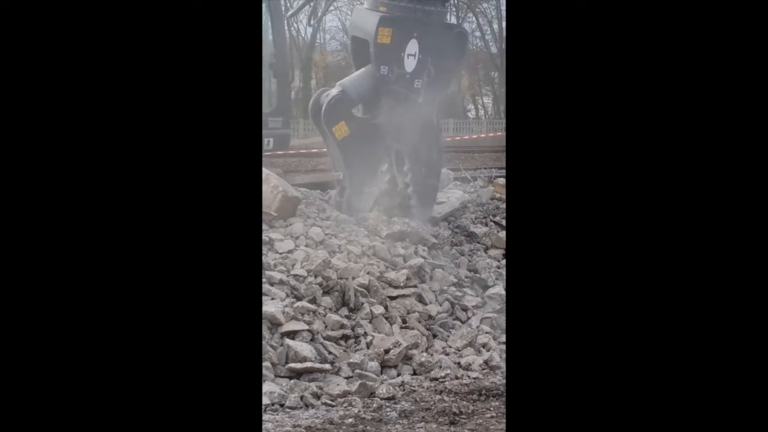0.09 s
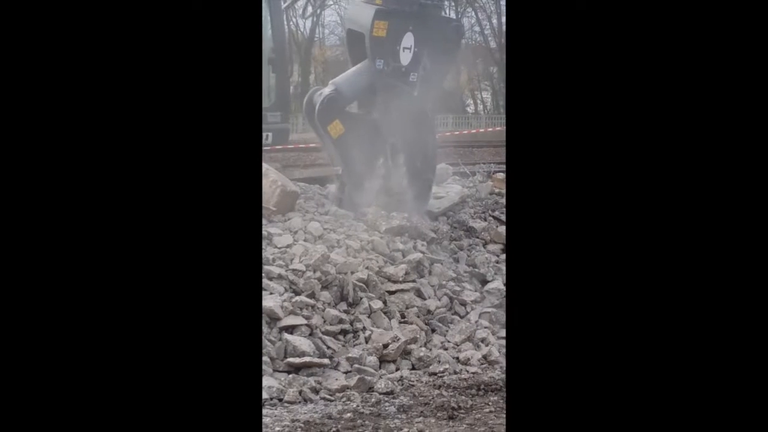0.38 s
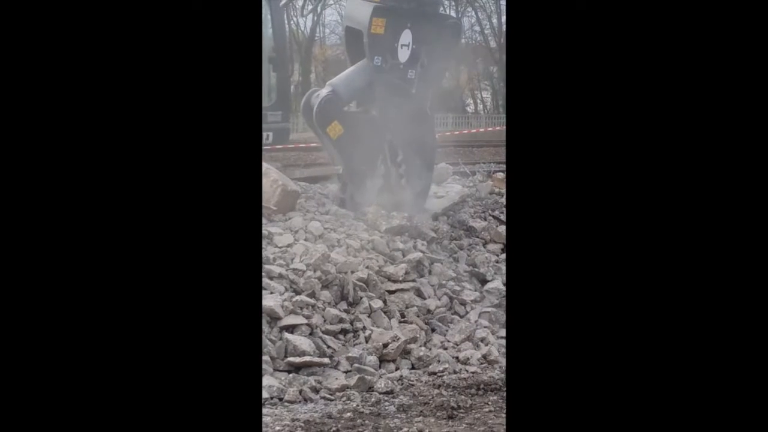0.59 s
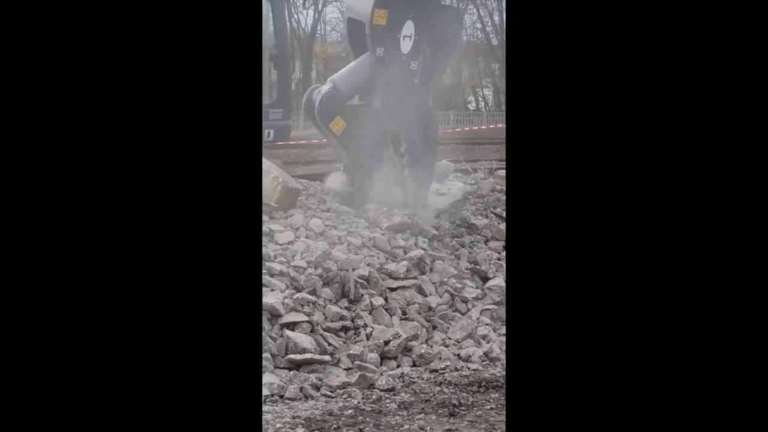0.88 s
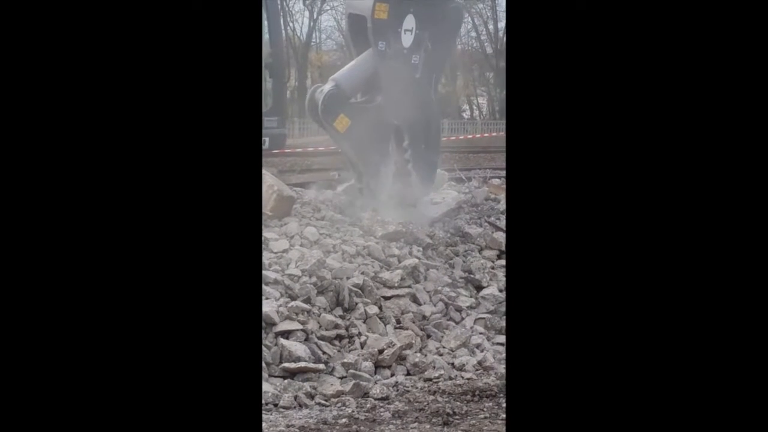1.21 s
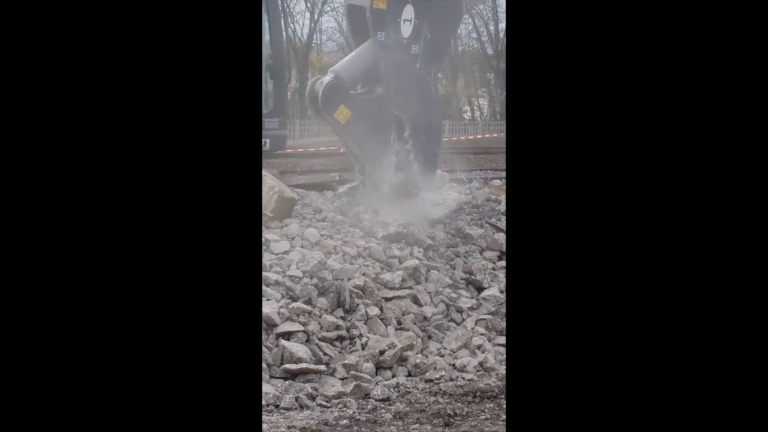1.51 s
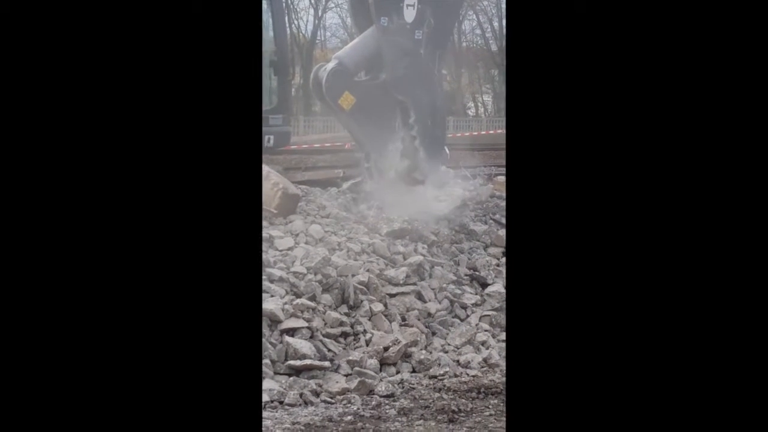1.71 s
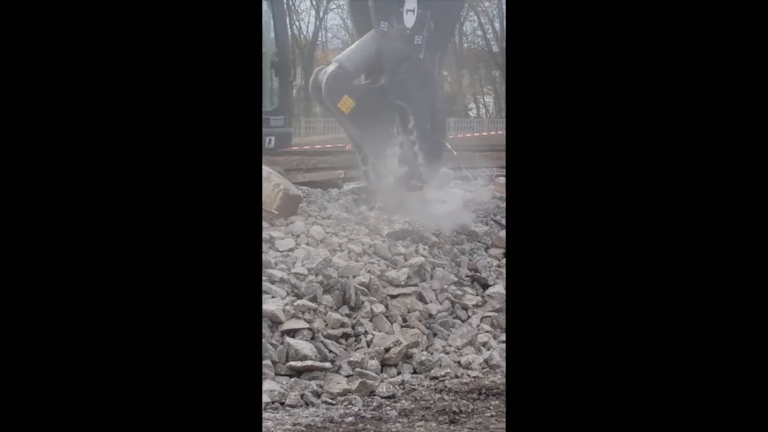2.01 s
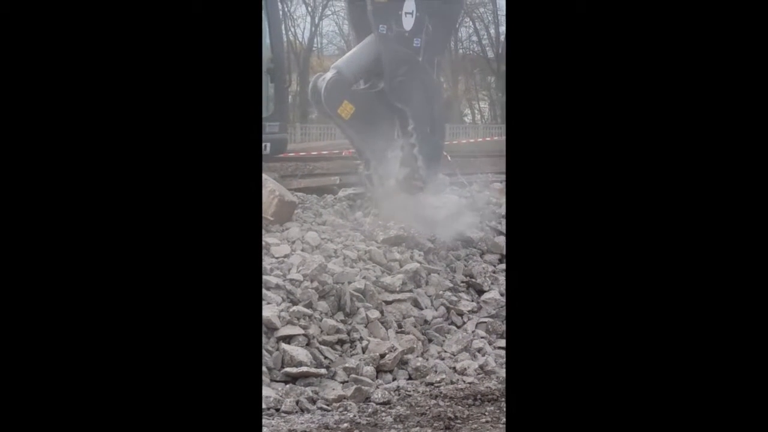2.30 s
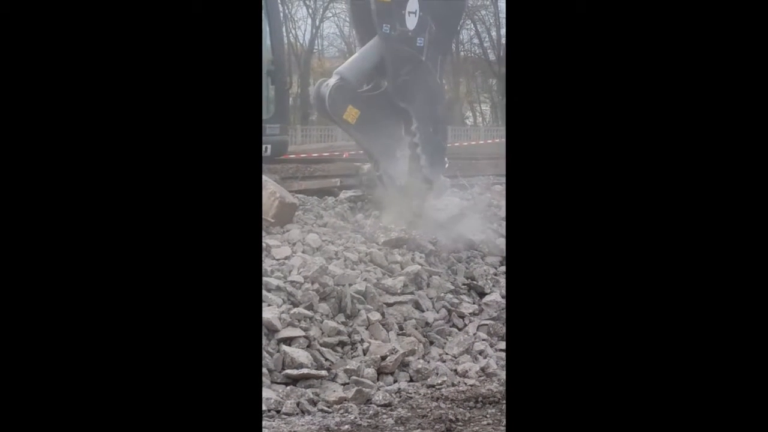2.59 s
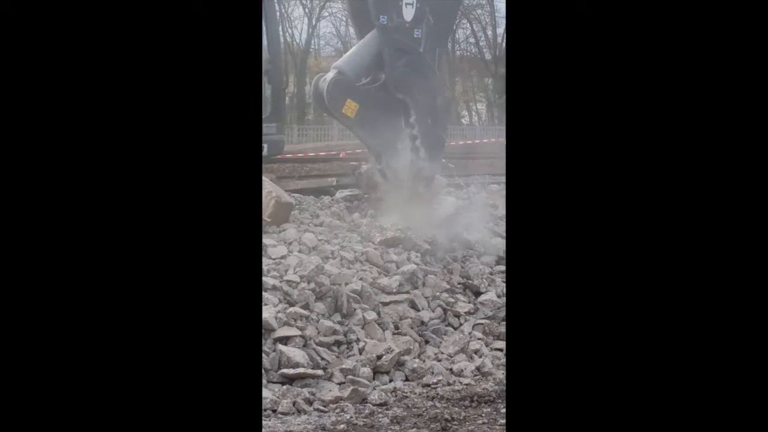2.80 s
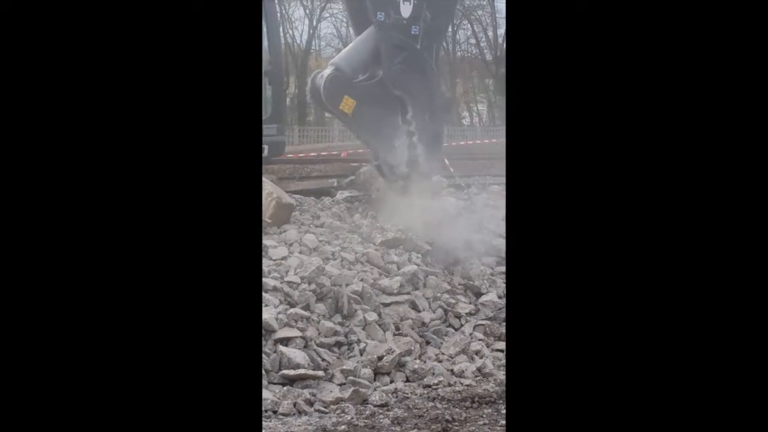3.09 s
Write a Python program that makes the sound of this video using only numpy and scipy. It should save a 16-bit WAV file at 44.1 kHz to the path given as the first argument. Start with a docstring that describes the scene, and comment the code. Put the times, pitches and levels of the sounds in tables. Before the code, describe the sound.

Steel crusher jaws break concrete in a rapid, overlapping run of cracks and grinding, then ease off, scrape in two short groups and end on a sharp break; engine hums steadily, close outdoor stereo microphone.

```python
"""A quick run of cracks breaks out over steady grinding: steel crusher jaws bite concrete as an engine hums.
After a lull come scrapes of steel on stone in two groups, then one last sharp break; steel groans in places.
Stone sounds are bursts of filtered random crackle. They ring the jaws, and all but the engine and hiss echo.
The engine is wavering tones over filtered noise. Low sounds are stronger on the left."""
import sys
import numpy as np
from scipy import signal
from scipy.fft import rfft, irfft
from scipy.io import wavfile
from scipy.ndimage import uniform_filter1d

SR = 44100
rng = np.random.default_rng(int(sys.argv[2]) if len(sys.argv) > 2 else 0)


def store_wav(level_fs):
    """Save 16-bit WAV to argv[1]."""
    pcm = np.round(np.clip(np.atleast_2d(level_fs), -1, 1) * 32767)
    wavfile.write(sys.argv[1], SR, pcm.T.astype(np.int16))


N = 141120  # length in samples


def amp(db):
    """Turns decibels into a plain multiplier."""
    return 10 ** (np.asarray(db) / 20)


def evened(x):
    """Scales each channel to an average strength (rms) of 1."""
    return x / np.sqrt(np.mean(x ** 2, axis=-1, keepdims=True) + 1e-20)


def read(points, hz, column=1):
    """Reads one column of a table between its rows, along a logarithmic frequency scale."""
    table = np.transpose(points)
    return np.interp(np.log(hz + 1), np.log(table[0] + 1), table[column])


def add(mix, start_s, sound):
    """Lays a sound into the mix from its start time, cutting what runs past the end."""
    start = max(round(start_s * SR), 0)
    part = mix[:, start:][:, :sound.shape[1]]
    part += sound[:, :part.shape[1]]


def colour(x, points, size=4096):
    """Filters a sound to the given spectrum, with no response ahead of the sound (minimum phase)."""
    hz = abs(np.fft.fftfreq(size, 1 / SR))
    log_gain = np.log(amp(read(points, hz)))
    # the Hilbert transform finds the phase that belongs to this gain
    response = np.exp(np.conj(signal.hilbert(log_gain)))
    kernel = np.fft.ifft(response).real[:size // 2]
    return signal.fftconvolve(x, kernel[None], axes=1)[:, :x.shape[1]]


def drift(count=12):
    """Slow wavering of rms 1: sines from 0.4 to 9 Hz that start at random points of their cycles."""
    t = np.arange(N) / SR
    return evened(sum(np.sin(2 * np.pi * (f * t + rng.random())) for f in np.geomspace(.4, 9, count)))


def grit(size, per_s, spread_db):
    """Tiny fractures at random moments: each is a short fading crackle of noise, uneven in strength."""
    decay_s = 0.0016
    happens = rng.random(size) < per_s / SR
    strength = amp(spread_db * np.minimum(rng.exponential(1, size), 3.5)) * happens
    # powers add up, and power fades twice as fast as amplitude
    power = signal.lfilter([1], [1, -np.exp(-2 / (decay_s * SR))], strength ** 2)
    return np.sqrt(power) * rng.standard_normal((2, size))


def hiss():
    """A faint steady hiss: separate filtered noise in each channel."""
    # Each row: frequency in Hz, relative level in dB.
    hiss_spectrum = [(2000, 0.61), (15500, 0.18)]
    level_db = -65
    return amp(level_db) * evened(colour(rng.standard_normal((2, N)), hiss_spectrum))


def engine():
    """Diesel and pump: tones of wavering pitch and strength over a dull, uneven rumble of noise."""
    # The steady tones. Each row: average frequency in Hz, level in dB.
    hum_tones = [(31, -62.5), (72, -54), (199.2, -52), (645, -65.5)]
    # The rumble. Each row: frequency in Hz, relative level in dB.
    rumble_spectrum = [(20, -42), (45, -9), (72, 13), (100, -8.5), (140, 6), (210, 2.5), (260, -6.5),
                       (400, -26.5), (620, -9), (850, -31.5), (4000, -51)]
    wander_hz, flutter, rumble_db = 1.07, 0.28, -51.5  # wander and flutter (a share of strength) are rms

    tones = 0
    for hz, db in hum_tones:
        strength = 1 + flutter * drift()
        phase = 2 * np.pi * np.cumsum(hz + wander_hz * drift()) / SR
        tones = tones + amp(db) * evened(strength * np.sin(phase))
    noise = colour(rng.standard_normal((2, N)), rumble_spectrum)
    rumble = evened((1 + flutter * drift()) * noise)
    # the tones enter the first channel only; ports() passes them on to the right
    return tones * np.array([[1], [0]]) + amp(rumble_db) * rumble


def yard(x, size=256):
    """A thin outdoor echo: the sound is smeared by a tail of noise whose bands die at their own speeds."""
    # Each row: frequency in Hz, time to fall by 60 dB in seconds.
    echo_times = [(100, 0.68), (700, 0.3), (3000, 0.62), (12000, 0.72)]
    level_db, rise_s = -8, 0.022
    hz, t, bands = signal.stft(rng.standard_normal((2, SR)), SR, nperseg=size)
    fade = np.exp(-np.log(1000) * t / read(echo_times, hz)[:, None])
    rise = np.minimum(t / rise_s, 1)
    tail = signal.istft(bands * fade * rise, SR, nperseg=size)[1]
    tail = tail / np.linalg.norm(tail[0])
    return amp(level_db) * signal.fftconvolve(x, tail, axes=1)[:, :N]


def grinding():
    """Rubble crumbles under the pressure of the jaws: dense grit that rises and falls in level."""
    # Each row: time in seconds, level in dB.
    grind_levels = [(0, -45), (.30, -44.5), (.35, -33.5), (.5, -36), (.68, -36.5), (0.949, -35),
                    (1.118, -35.5), (1.3, -38), (1.42, -46), (1.6, -57), (1.95, -54.5), (2.36, -46.5),
                    (2.46, -39), (2.6, -39.5), (2.82, -49.5), (3.2, -52.5)]
    # Each row: frequency in Hz, relative level in dB.
    rubble_spectrum = [(40, -24), (85, 0), (140, 3), (290, -13), (520, -8.5), (680, -6), (900, -15),
                       (1300, -18), (2100, -25.5), (3200, -41.5), (4800, -35.5), (15500, -48.5)]
    per_s, spread_db = 900, 4
    level = amp(np.interp(np.arange(N) / SR, *np.transpose(grind_levels)))
    return level * evened(colour(grit(N, per_s, spread_db), rubble_spectrum))


def scraping():
    """Steel teeth slide on concrete: dense tiny slips that swell and fade."""
    # Each row: time of the peak in seconds, level in dB, swell in seconds, fade in seconds.
    scrape_events = [(2.232, -47, 0.009, 0.067), (2.329, -43.5, 0.016, 0.014), (2.42, -33, 0.02, 0.083),
                     (2.46, -34.5, 0.042, 0.058), (2.695, -25, 0.028, 0.033), (2.779, -39.5, 0.011, 0.012)]
    # Each row: frequency in Hz, relative level in dB.
    scrape_spectrum = [(60, -22.5), (140, 3), (230, -5.5), (400, -10.5), (570, 1), (900, -10), (1170, 0),
                       (1400, -10), (2200, -18.5), (3200, -33.5), (5000, -27.5), (15500, -43)]
    slips_per_s, spread_db = 1500, 2.5
    t = np.arange(N) / SR
    power = 0
    for peak_s, db, swell_s, fade_s in scrape_events:
        # the swell counts before the peak, the fade after it
        fall = np.maximum((peak_s - t) / swell_s, (t - peak_s) / fade_s)
        power = power + (amp(db) * np.exp(-fall)) ** 2
    return np.sqrt(power) * evened(colour(grit(N, slips_per_s, spread_db), scrape_spectrum))


def groans():
    """Steel that sticks and slips groans or squeaks: short, unsteady tones that glide as the load changes."""
    # Each row: start in seconds, length in seconds, start pitch in Hz, end pitch in Hz,
    # level in dB before the rise and fall.
    groan_events = [(0.347, 0.33, 650, 646.3, -41), (0.923, 0.13, 654, 641.5, -36.5),
                    (1.173, .035, 578, 554, -29), (1.263, 0.092, 641.4, 646.4, -34),
                    (1.877, 0.029, 4370, 4290, -58), (2.0, 0.057, 1542, 1410, -60),
                    (2.033, 0.045, 459, 566, -45), (2.22, 0.17, 1150, 1235, -57),
                    (2.222, 0.15, 4350, 4430, -65), (2.32, 0.06, 573, 540, -43),
                    (2.485, 0.072, 143, 145, -35.5), (2.72, 0.075, 142, 145, -34)]
    rise_s, smooth_s = 0.0033, 0.0023  # smooth_s: how long the wander is averaged over
    pitch_wander, judder = 0.03, 0.6  # as shares of the pitch and of the strength
    out = np.zeros((2, N))
    for start_s, length_s, start_hz, end_hz, db in groan_events:
        t = np.arange(0, length_s, 1 / SR)
        noise = rng.standard_normal((2, len(t)))
        wander = evened(uniform_filter1d(noise, max(round(smooth_s * SR), 1)))
        glide_hz = start_hz + (end_hz - start_hz) * t / length_s
        hz = glide_hz * (1 + pitch_wander * wander)
        # each channel's strength follows the other channel's wander
        tone = np.sin(2 * np.pi * np.cumsum(hz, axis=1) / SR) * (1 + judder * wander[::-1])
        shape = np.minimum(t / rise_s, 1) * (1 - (t / length_s) ** 2)
        add(out, start_s, amp(db) * shape * evened(tone))
    return out


def jaws(x):
    """The steel jaws ring: the stone sounds drive a set of fading cosine tones."""
    # Each row: frequency in Hz, gain at that frequency in dB, time to fall by 60 dB in seconds.
    ring_tones = [(143.4, 1, 0.22), (329, -1.5, 0.1), (468, -2, 0.16), (561.5, -1.5, 0.11),
                  (642.9, 6, 0.25), (1164, -6, 0.15), (1560, -2.5, 0.041)]
    t = np.arange(SR // 2) / SR
    ring = 0
    for hz, db, t60_s in ring_tones:
        fade = np.exp(-np.log(1000) * t / t60_s)
        ring = ring + amp(db) * 2 * fade / fade.sum() * np.cos(2 * np.pi * hz * t)
    return signal.fftconvolve(x, ring[None], axes=1)[:, :N]


def burst(level_db, spectrum, shape, size=8192):
    """An avalanche of tiny fractures that swells and dies, with its energy set by the level."""
    chips_per_s, spread_db = 2500, 1
    gain_db, rise_s, decay_s = shape
    t = np.arange(size) / SR
    swell_and_fade = (1 - np.exp(-t / rise_s)) * np.exp(-t / decay_s)
    sound = colour(grit(size, chips_per_s, spread_db) * swell_and_fade, spectrum)
    # the level counts as if all the energy fell within 30 ms
    window = .03 * SR
    return amp(level_db + gain_db) * evened(sound) * np.sqrt(window / size)


def cracks():
    """Each break is a fast snap and clack with a crunch and a deep slab thud that swell more slowly."""
    # Each row: start in seconds, then levels of thud, crunch, clack and snap in dB before the shape's gain.
    crack_events = [(.049, -39, -64, -80, -61), (.196, -36.5, -36, -41, -54.5),
                    (.295, -35.5, -62, -56, -61), (.329, -30.5, -33, -40, -50),
                    (.360, -30.5, -33, -42.5, -69), (.399, -25, -28, -34.5, -54),
                    (.542, -30, -37, -44.5, -66), (.620, -32.5, -40, -49.5, -60),
                    (.654, -36.5, -51, -44, -62), (.704, -37, -40.5, -36.5, -52),
                    (.721, -25.5, -34.5, -35, -50.5), (.749, -35, -35, -35, -46),
                    (.815, -40, -39, -45, -74), (.853, -25.5, -33.5, -37, -59),
                    (.918, -31.5, -33.5, -34, -48.5), (1.035, -27, -31, -34, -50.5),
                    (1.111, -66, -39, -42, -60), (1.169, -30.5, -33, -39, -56.5),
                    (1.259, -38.5, -42.5, -38, -57), (1.341, -41.5, -39.5, -44.5, -61),
                    (1.867, -49, -49.5, -49.5, -60.5), (2.848, -34.5, -29, -31, -41.5)]
    # The spectra of the four parts. Each row: frequency in Hz, relative level in dB.
    thud = [(40, -23), (66, -10.5), (100, 0), (140, 1), (185, -5.5), (250, -10), (600, -64.5)]
    crunch = [(160, -15.5), (320, -2), (400, -6.5), (500, 1), (700, 0.5), (1300, -41)]
    clack = [(500, -13), (1150, 3), (1700, -7.5), (2200, -9), (2800, -26), (4200, -52)]
    snap = [(1000, 8.5), (3200, 0), (4500, 6.5), (6400, 4), (8000, -2.5), (10000, -6.5), (15500, -26)]
    # Their shapes. Each holds: extra gain in dB, rise in seconds, decay in seconds.
    thud_shape = (0.36, 0.0062, 0.016)
    crunch_shape = (1.08, 0.009, 0.015)
    clack_shape = (0.51, 0.0013, 0.02)
    snap_shape = (1.6, 0.0003, 0.014)

    parts = [(thud, thud_shape), (crunch, crunch_shape), (clack, clack_shape), (snap, snap_shape)]
    out = np.zeros((2, N))
    for start_s, *levels_db in crack_events:
        add(out, start_s, sum(burst(db, *part) for db, part in zip(levels_db, parts)))
    return out


def ports(x):
    """Two microphone ports: the right hears a re-levelled, lagging, partly unrelated version of the left."""
    # Each row: frequency in Hz, right level against left in dB, likeness from 0 to 1, lag in radians.
    port_table = [(80, -10, 0.86, 0.3), (800, -11, 1, 0.19), (927, -12, 0.64, 1.7),
                  (1190, -20.5, 0.75, 5.2), (1920, -10.5, 0.73, 3.96), (3300, 7, 0.23, 2.45),
                  (4130, -0.5, 0.5, 4.94), (9100, 0, 0.38, 3.04)]
    hz = np.fft.rfftfreq(N, 1 / SR)
    left, other = rfft(x)
    likeness = np.clip(read(port_table, hz, column=2), 0, 1)
    lagged = np.exp(-1j * read(port_table, hz, column=3)) * left
    blend = likeness * lagged + np.sqrt(1 - likeness ** 2) * other
    right = amp(read(port_table, hz)) * blend
    return irfft(np.array([left, right]), N)


def scene():
    """Mixes breaking stone, ringing and groaning steel, their echo, the engine and a faint hiss."""
    stone = cracks() + grinding() + scraping()
    crusher = stone + jaws(stone) + groans()
    return ports(crusher + yard(crusher) + engine()) + hiss()


def record(dry):
    """The recorder's band limit: a low-pass filter takes away the highest treble."""
    edge_hz = 15750
    kernel = signal.firwin(511, edge_hz, window=("kaiser", 9), fs=SR)
    return signal.oaconvolve(dry, kernel[None], "same")


dry = scene()
out = record(dry)
store_wav(out)
```